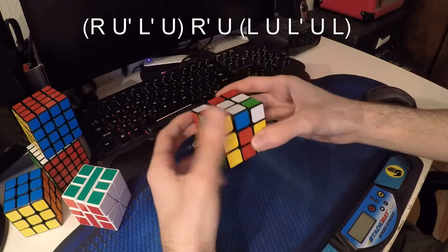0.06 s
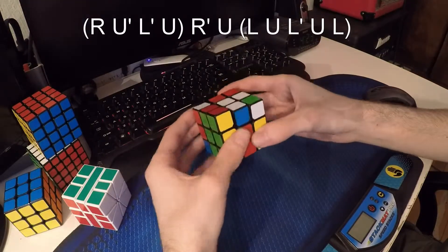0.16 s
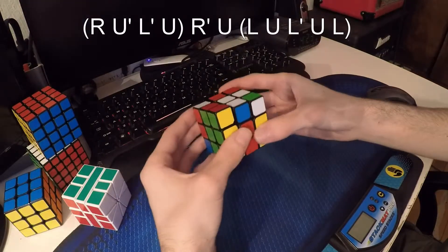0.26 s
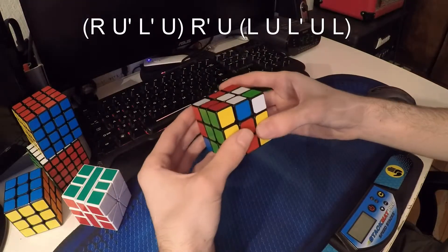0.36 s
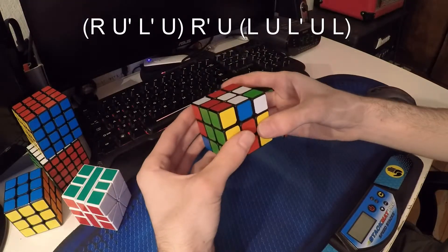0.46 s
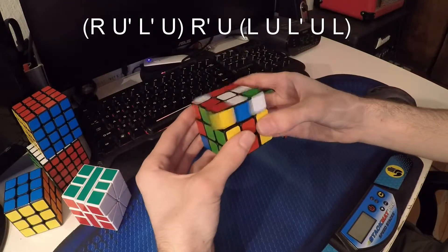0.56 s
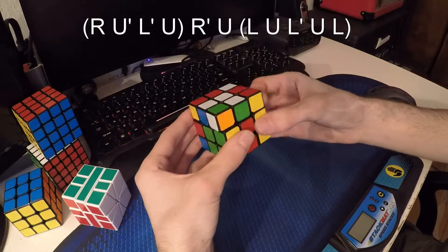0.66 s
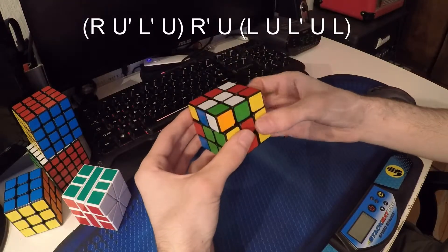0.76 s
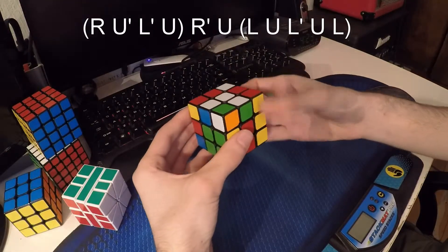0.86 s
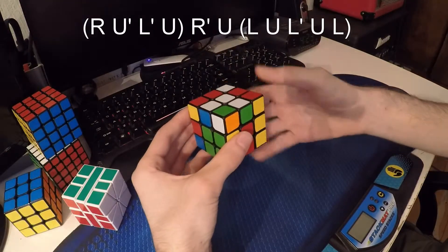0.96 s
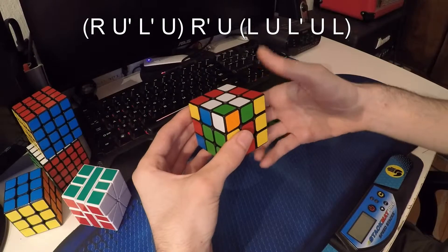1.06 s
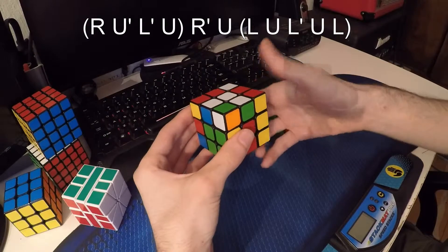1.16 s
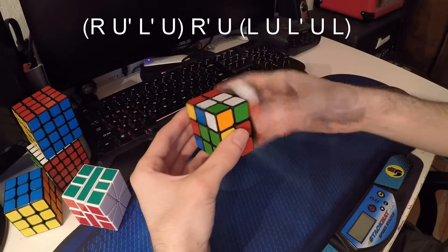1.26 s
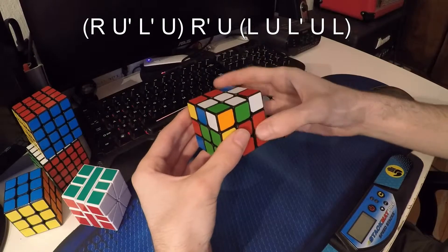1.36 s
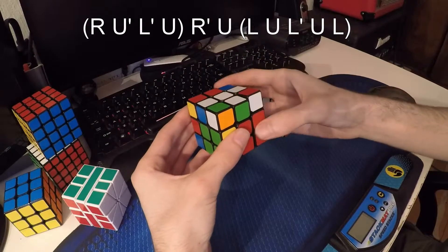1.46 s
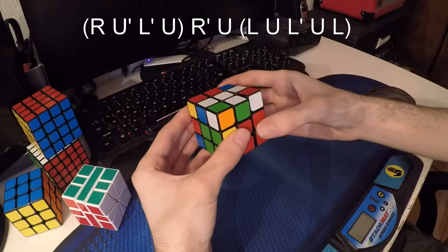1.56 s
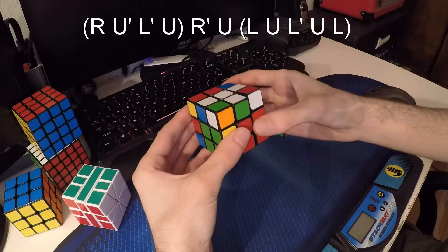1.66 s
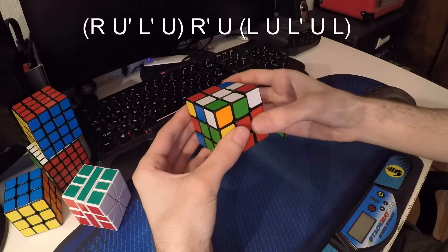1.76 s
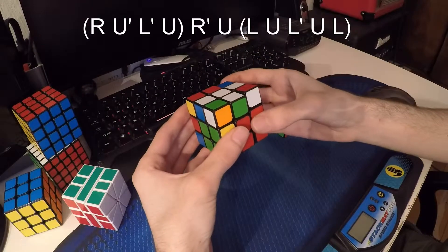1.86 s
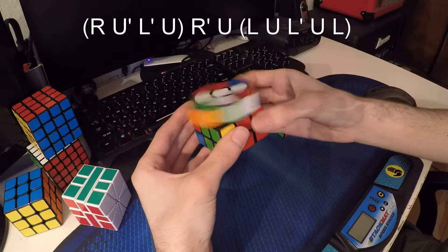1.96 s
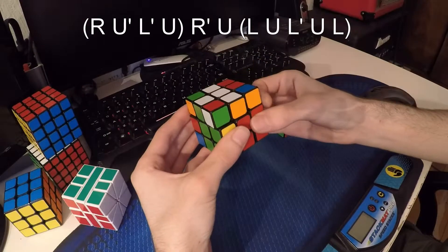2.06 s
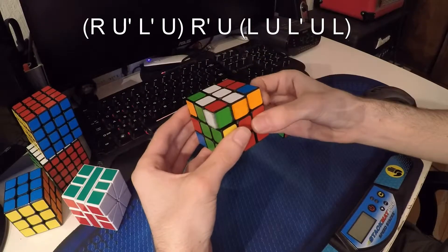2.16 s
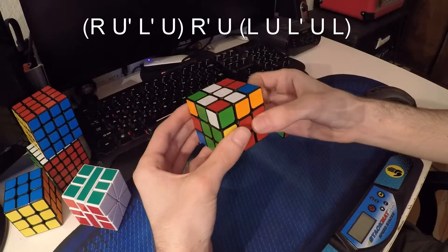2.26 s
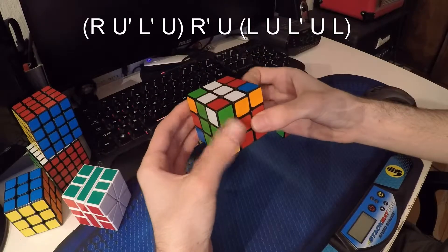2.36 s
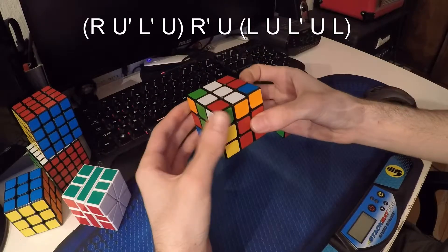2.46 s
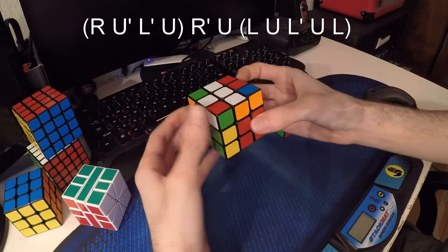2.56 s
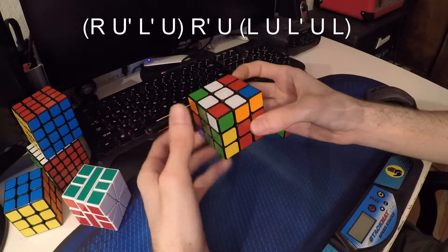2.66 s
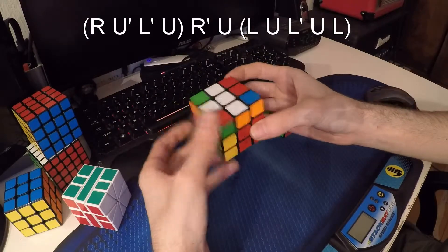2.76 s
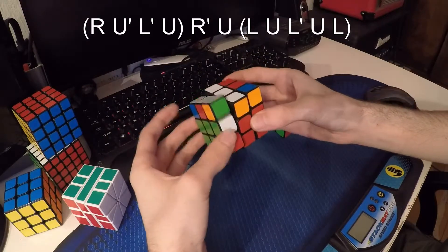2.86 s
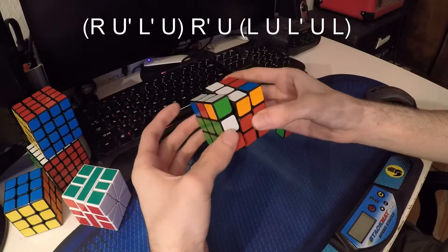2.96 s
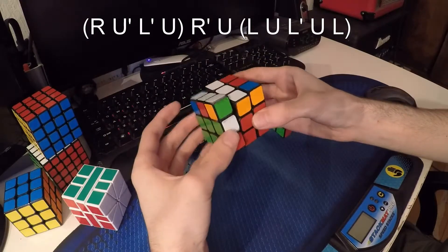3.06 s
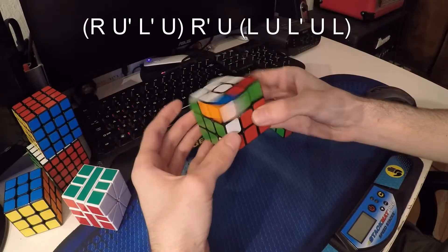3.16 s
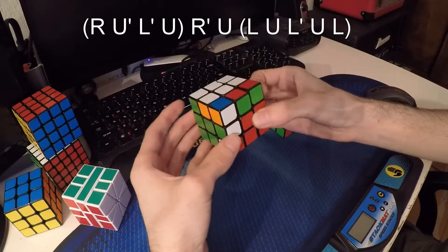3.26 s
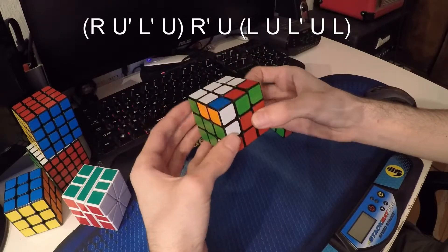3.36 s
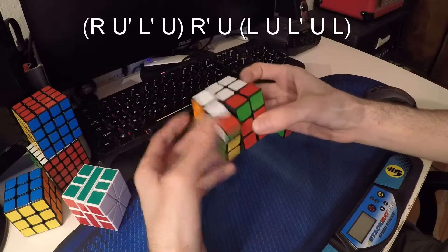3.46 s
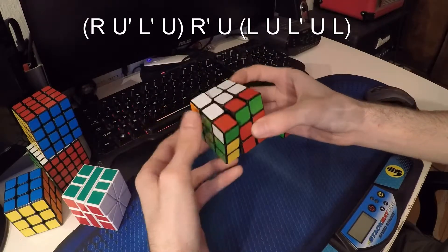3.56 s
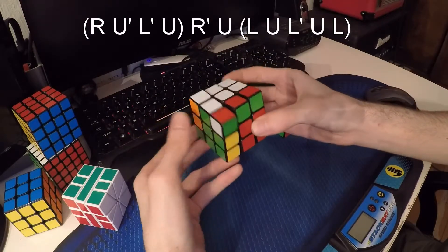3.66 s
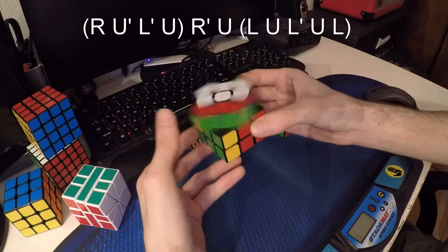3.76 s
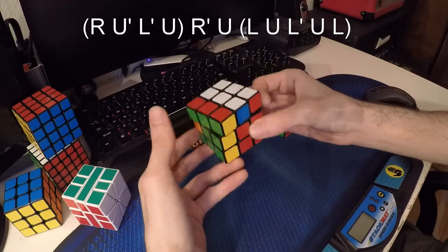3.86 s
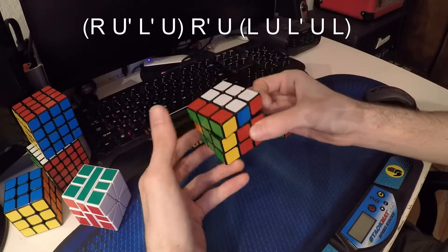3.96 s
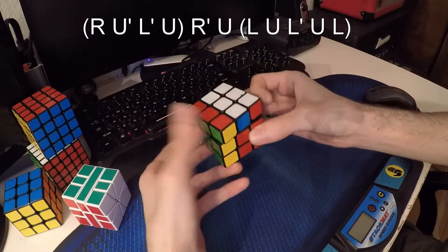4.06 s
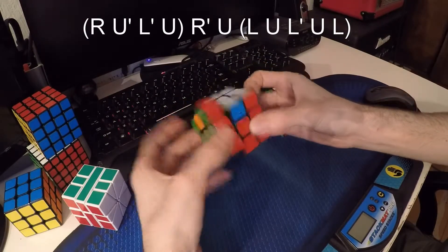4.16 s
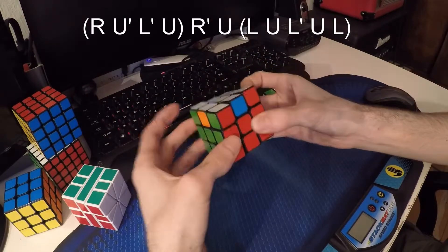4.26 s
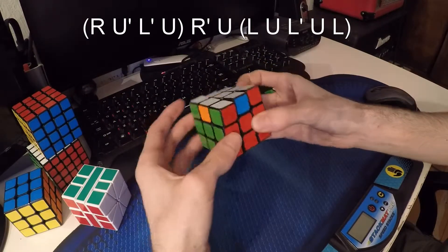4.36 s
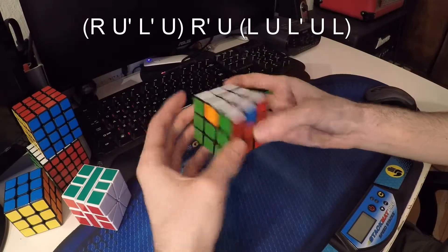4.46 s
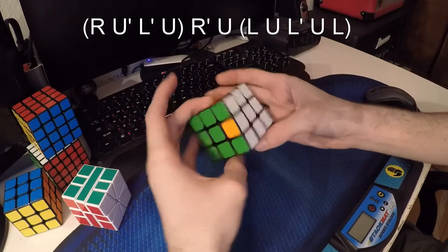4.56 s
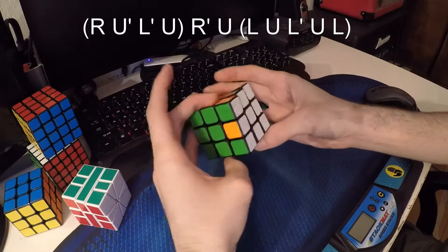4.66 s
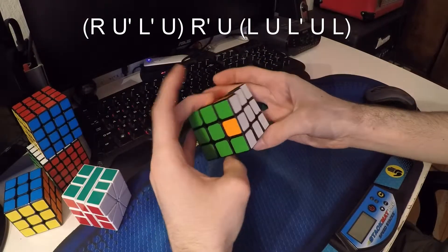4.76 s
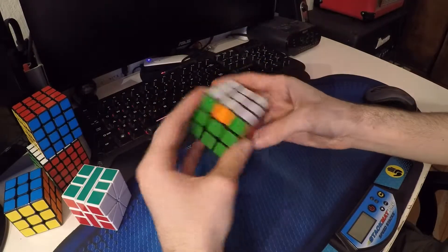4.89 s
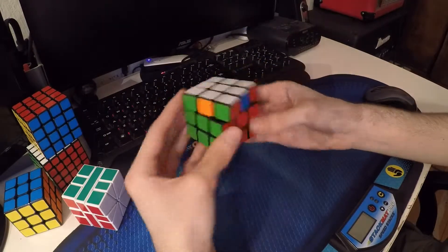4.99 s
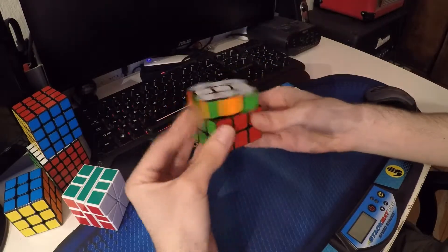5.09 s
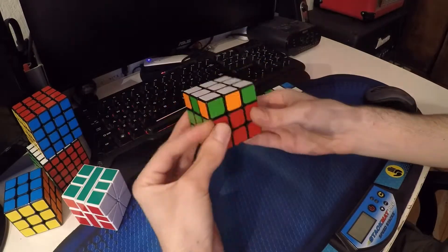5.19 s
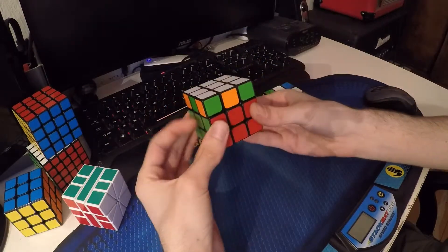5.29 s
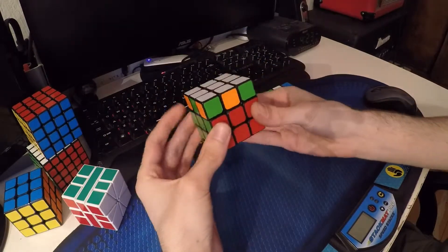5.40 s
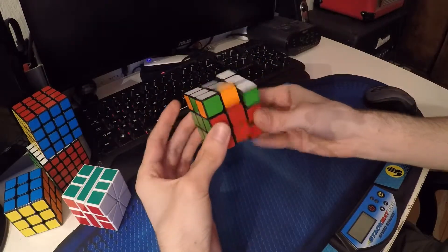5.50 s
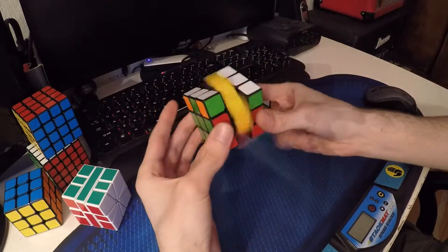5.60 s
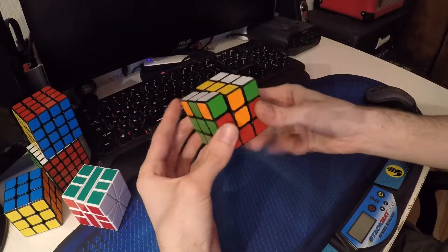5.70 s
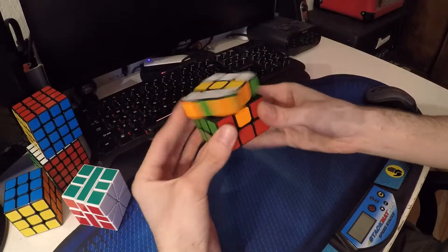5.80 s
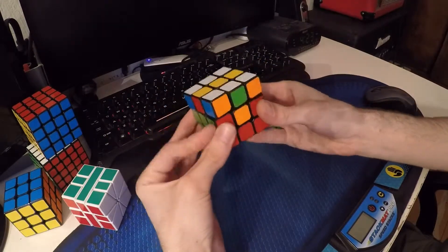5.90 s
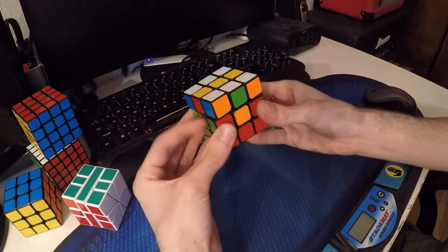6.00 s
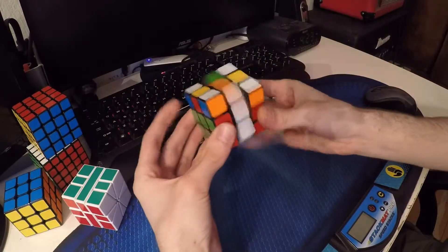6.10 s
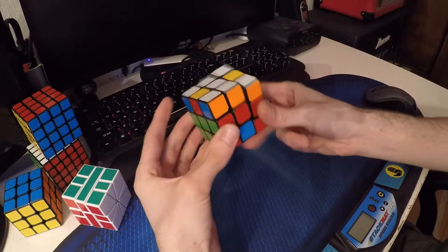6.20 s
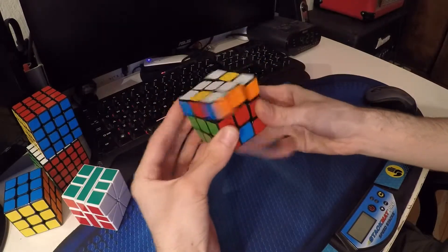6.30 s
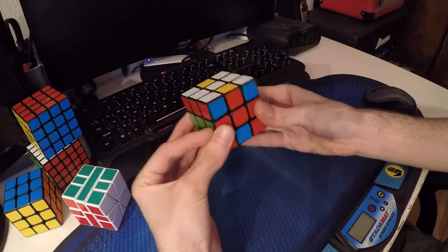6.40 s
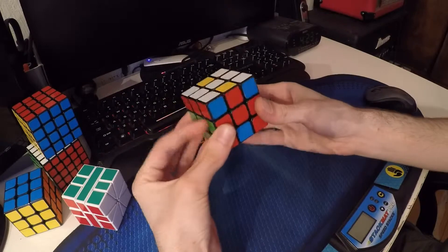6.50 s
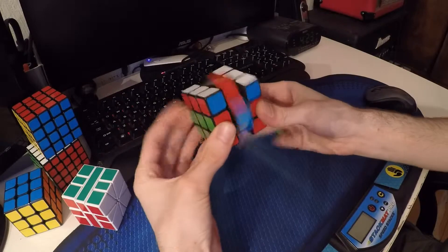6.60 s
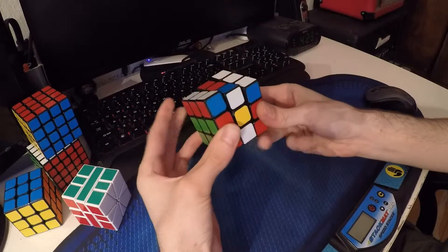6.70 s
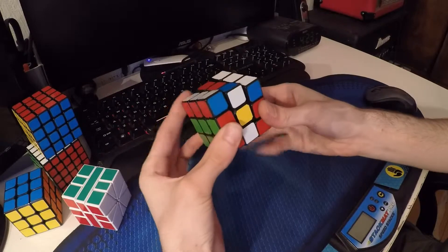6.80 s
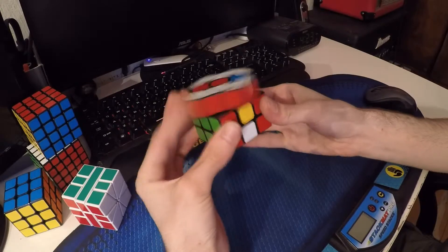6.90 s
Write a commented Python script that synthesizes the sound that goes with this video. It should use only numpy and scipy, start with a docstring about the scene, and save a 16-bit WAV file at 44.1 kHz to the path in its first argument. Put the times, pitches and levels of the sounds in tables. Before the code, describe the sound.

Over the faint, steady hum of a computer fan, hands turn a plastic puzzle cube close to a small microphone. The hollow pieces snap together in brief clusters of bright clacks, separated by soft ticks and an occasional faint low thud through the desk. After a short lull, the twists return in a quicker, denser run. The small room adds a slight, short echo.

```python
"""A computer fan hums throughout. From the start, a plastic puzzle cube is twisted by hand over a desk,
close to a small microphone. Each twist is a run of clacks as hollow pieces ride over and snap against
each other; a small room answers. From 0.22 s, loose pieces tick now and then as the fingers shift grip.
From 0.6 s, some twists shake the desk faintly. The densest run of clacks comes just after 6 s."""
import sys
import numpy as np
from scipy import signal
from scipy.fft import rfft, irfft
from scipy.io import wavfile
from scipy.ndimage import uniform_filter1d

SR = 44100
rng = np.random.default_rng(int(sys.argv[2]) if len(sys.argv) > 2 else 0)


def master(y):
    """Save y as 16-bit WAV."""
    cut = np.clip(np.atleast_2d(y).T, -1, 1)
    pcm = np.round(cut * 32767)  # scale
    wavfile.write(sys.argv[1], SR, pcm.astype(np.int16))


N = 306054
STRIKE_SAMPLES, ONSET_SAMPLE = 2048, 440
STRIKE_BINS_HZ = np.arange(STRIKE_SAMPLES // 2 + 1) * SR / STRIKE_SAMPLES


def undb(db):
    return 10 ** (np.asarray(db) / 20)


def at_rms(x, db):
    return x * undb(db) / np.sqrt(np.mean(x ** 2))


def unit_burst(x):
    """Scale each row so its loudest millisecond has the power of a unit sine."""
    power = uniform_filter1d(x ** 2, size=44)
    return x / np.sqrt(2 * power.max(axis=1, keepdims=True))


def resonance(f, hz, width_hz):
    """Causal band-pass response, gain 1 at the centre."""
    return 1j * f * width_hz / (hz ** 2 - f ** 2 + 1j * f * width_hz)


def drift(rate_hz):
    """Random steps, smoothed twice; spread near 1."""
    hold = int(SR / rate_hz)
    steps = np.repeat(rng.standard_normal(N // hold + 1), hold)
    return 1.42 * uniform_filter1d(uniform_filter1d(steps, hold), hold)[:N]


# Casing and room resonances excited by the fan's air: centre_hz, width_hz, rms_db
FAN_MODES = [(40.5, 4.2, -56.5), (130.2, 5.6, -62), (173.1, 2.9, -63.5), (246.3, 5.3, -58.5),
             (302, 34, -66.5), (427, 84, -64.5)]
# Air rush spectrum: frequency_hz, relative_density_db
RUSH_SPECTRUM = [(12, -66), (20, -17), (44, -7.5), (70, -5), (90, -15), (116, -16.5), (259, -18.5),
                 (333, -20), (906, -26.5), (1270, -27), (1670, -30.5), (1980, -32.5), (7310, -47),
                 (13100, -52), (15500, -54)]


def fan(hum_hz=65.2, hum_db=-46.5, rush_db=-50.5):
    """A wavering motor hum and ringing resonances over a steady rush of air."""
    phase = 2 * np.pi * np.cumsum(hum_hz * (1 + 0.003 * drift(3.22))) / SR
    out = at_rms(undb(0.66 * drift(2.64)) * np.sin(phase), hum_db)
    f = np.maximum(np.arange(N // 2 + 1) * SR / N, 1)
    for hz, width_hz, db in FAN_MODES:
        noise = rfft(rng.standard_normal(N))
        out += at_rms(irfft(noise * resonance(f, hz, width_hz) ** 2, N), db)
    hz, db = np.transpose(RUSH_SPECTRUM)
    colour = undb(np.interp(np.log(f), np.log(hz), db))
    rush = irfft(rfft(rng.standard_normal(N)) * colour, N)
    return out + at_rms(rush, rush_db)


# Pieces snapping together: start_s, level_db, pitch_hz, rattle_ms
CLACKS = [(-.03, -21, 4740, 2.8), (0.013, -41.5, 5100, 4.7), (.1217, -34, 4800, 2.9),
          (0.3047, -47, 5000, 3), (.458, -46, 3100, 1.5), (0.4729, -44, 4670, 1.43), (0.593, -39, 5840, 13),
          (.6235, -27, 5570, 7.5), (.651, -19.5, 4300, 2.4), (.657, -26.5, 3200, 3.6),
          (0.6731, -23.5, 5450, 3.9), (0.824, -42.5, 4100, 3.8), (0.8654, -35, 5400, 2.4),
          (1.145, -34.5, 2960, 1.8), (1.2528, -23, 4860, 3.8), (1.277, -30, 4540, 5.1),
          (1.302, -30.5, 5100, 5.9), (1.308, -33.5, 5000, 2), (1.3188, -33.5, 3330, 3.1),
          (1.3515, -39.5, 4800, 3), (1.709, -43.5, 4860, 3.54), (1.929, -35, 5400, 2.9),
          (1.9733, -31, 4820, 5.5), (2.0038, -21.5, 3630, 2.9), (2.0189, -25, 5500, 13.7),
          (2.024, -13.5, 5200, 8.3), (2.0379, -18, 6150, 1.5), (2.0426, -19, 5170, 4.9),
          (2.062, -28, 4350, 4.4), (2.115, -45, 5000, 8.3), (2.2113, -42, 4330, 3.1),
          (2.2348, -48, 3970, 1.9), (2.376, -41, 6200, 3.2), (2.3983, -47.5, 3640, 3.5),
          (2.813, -30.5, 5200, 4), (2.8398, -19.5, 4560, 2.07), (2.8723, -35, 4700, 6.6),
          (2.8773, -22.5, 4400, 2.46), (3.1174, -30.5, 4250, 3.2), (3.1612, -24, 4040, 3.4),
          (3.1872, -30, 6100, 8.3), (3.1944, -10.5, 5000, 1.26), (3.2024, -18, 5700, 6.3),
          (3.2155, -15, 5200, 3.4), (3.446, -35.5, 4000, 3.6), (3.4553, -40, 5230, 4.6),
          (3.4617, -28.5, 3460, 7.2), (3.493, -38, 4830, 8.6), (3.5063, -28, 4700, 2.9),
          (3.692, -44, 3570, 8.2), (3.7476, -35, 5470, 2.3), (3.7963, -31, 3040, 6.3),
          (3.8124, -22.5, 4470, 2.1), (3.8196, -24.5, 7300, 1.8), (3.8224, -14, 5170, 5.1),
          (3.8451, -31, 4730, 5), (4.147, -34, 5000, 10), (4.154, -16.5, 4500, 2.3),
          (4.1698, -31, 4300, 12), (4.177, -28, 4200, 1.84), (4.1825, -26.5, 5400, 1.46),
          (4.1925, -18, 4550, 17), (4.2062, -14.5, 5120, 3.7), (4.2093, -7, 5360, 2.7),
          (4.3701, -35, 5270, 2.7), (4.4355, -30.5, 4600, 3.2), (4.5602, -45.5, 3563, 10),
          (4.6653, -47.5, 3650, 1.96), (4.9127, -38.5, 3160, 2.58), (4.922, -41, 5230, 2.17),
          (4.9968, -43, 6740, 2.8), (5.0042, -41.5, 4500, 3.2), (5.0319, -31, 4220, 3.3),
          (5.0792, -45.5, 3500, 23), (5.1017, -32.5, 4260, 1.7), (5.1116, -38, 4600, 4.2),
          (5.1272, -36, 3070, 5), (5.135, -28.5, 3860, 1.3), (5.1451, -35.5, 4800, 5.4),
          (5.152, -36.5, 3700, 5), (5.3727, -44.5, 3900, 4.2), (5.44, -42.5, 4400, 2.3),
          (5.5407, -30.5, 3970, 6.8), (5.561, -20, 4030, 3.1), (5.574, -28, 4000, 2.4),
          (5.578, -22.5, 4600, 12.5), (5.5853, -15.5, 5070, 2.1), (5.595, -17, 4850, 4.9),
          (5.614, -28.5, 4600, 2.9), (5.634, -20.5, 3730, 3.6), (5.644, -27.5, 4600, 5.4),
          (5.6487, -27.5, 5050, 3.9), (5.6603, -13, 4720, 2.3), (5.791, -32, 4900, 1.87),
          (5.8362, -25.5, 3940, 3.6), (5.864, -23, 4440, 3.5), (5.8715, -15, 4380, 1.6),
          (5.8806, -33.5, 4240, 7.1), (6.0546, -38, 4970, 1.9), (6.096, -40.5, 3400, 5),
          (6.1085, -27, 4420, 13), (6.1193, -15.5, 3760, 3), (6.1278, -21.5, 3970, 5.5),
          (6.1335, -11.5, 5380, 7.2), (6.141, -13.5, 4200, 5.5), (6.152, -14, 4860, 6.2),
          (6.1625, -25, 5300, 3.2), (6.1781, -23, 5140, 3.8), (6.198, -29, 4300, 3.9),
          (6.2087, -24, 4600, 4.2), (6.2116, -24, 4900, 9.8), (6.2198, -13, 5500, 5.1),
          (6.2304, -23, 4700, 6.1), (6.3137, -38.5, 3980, 14), (6.3615, -27.5, 4040, 5.1),
          (6.3831, -26.5, 4400, 18), (6.3941, -19.5, 4930, 1), (6.405, -30, 4480, 1.8),
          (6.6073, -44, 4400, 3.4), (6.6331, -19.5, 4500, 2.18), (6.6451, -29, 4010, 10.2),
          (6.6565, -22, 4560, 1.8), (6.6614, -12.5, 4970, 1.8), (6.6672, -17.5, 4650, 2),
          (6.679, -30.5, 4430, 7.5), (6.868, -45, 3880, 3.1), (6.887, -42.5, 3830, 6.2),
          (6.911, -43.5, 4600, 11.4), (6.9181, -28, 3140, 5.6)]


def clacks(firm_db=-30, catch_lead_ms=2.6, follow_lag_ms=10.5):
    """Strike rows. Edges catch just before a firm clack; a softer copy follows about 10 ms after it."""
    rows = np.array(CLACKS)
    start_s, db, hz, _ = rows[rows[:, 1] > firm_db].T
    a, b, c = rng.uniform(-.5, .5, (3, len(start_s)))
    catch_s = start_s - (catch_lead_ms + 1.6 * c) / 1000
    follow_s = start_s + (follow_lag_ms + 6 * a) / 1000
    catches = np.transpose([catch_s, db - 17 + 6 * a, hz, 2.3 * (1 + b)])
    followers = np.transpose([follow_s, db - 20.5 + 6 * b, hz, 7.7 * (1 + c)])
    return np.concatenate([rows, followers, catches])


def contact_force(rattle_ms):
    """Per strike: a scrape as faces close in, a first blow, a dying rattle of smaller ones."""
    shape = (len(rattle_ms), STRIKE_SAMPLES)
    t_ms = (np.arange(STRIKE_SAMPLES) - ONSET_SAMPLE) / SR * 1000
    age_ms, length_ms = np.maximum(t_ms, 0), rattle_ms + 0.12
    # many small contacts, a few large
    grains = rng.choice([-1, 1], shape) * undb(rng.exponential(3.5, shape))
    scrape = undb(-24) * np.exp(-np.abs(t_ms) / 1.5)
    rise = 1 - np.exp(-age_ms / (0.048 * length_ms))
    decay = np.exp(-(age_ms / (0.59 * length_ms)) ** 0.64)
    force = 0.15 * grains * (scrape + rise * decay)
    force[:, [ONSET_SAMPLE]] += 2.93 / length_ms  # a short clack is mostly one hard contact
    return force


def ring(modes, strike_count):
    """Each strike lands elsewhere, so the modes ring in new proportions."""
    return sum(rng.uniform(-1, 1, (strike_count, 1)) * undb(db) * resonance(STRIKE_BINS_HZ, hz, width_hz)
               for hz, width_hz, db in modes)


# Cube shell modes: centre_hz, width_hz, relative_db
SHELL_MODES = [(2560, 990, 2.5), (2884, 186, 2), (3430, 250, 6.5), (4330, 1650, -21), (5480, 4300, -4),
               (6480, 205, 2.5), (6800, 2200, 1)]


def shell_ring(force_spectra, piece_response):
    """The struck piece rings broadly, together with the shell's modes."""
    response = piece_response + 0.727 * ring(SHELL_MODES, len(force_spectra))
    return unit_burst(irfft(force_spectra * response))


# Air modes inside the pieces: centre_hz, width_hz, relative_db
CAVITY_MODES = [(584, 95, 8.5), (797, 260, 4.5), (1500, 270, 5), (1790, 680, 9)]


def hollow_knock(force_spectra):
    """The air inside the pieces answers with a lower knock."""
    response = ring(CAVITY_MODES, len(force_spectra)) + 0.1 * resonance(STRIKE_BINS_HZ, 1440, 2700) ** 2
    return unit_burst(irfft(force_spectra * response))


def knock_balance_db(level_db, rattle_ms, best_db=-30.5):
    """Knock relative to shell: greatest at mid level, as hard blows ring mostly the shell."""
    over_db = level_db - best_db
    loss_db = np.maximum(0.57 * over_db, -0.17 * over_db)
    pump_db = 1.78 * np.log2(rattle_ms + .5)  # a longer rattle pumps the hollow more
    return -10.5 - loss_db + pump_db + rng.uniform(-3.5, 3.5, level_db.shape)


def cube(strikes, lead_samples, contact_hz=8660, spot_count=5):
    """Strikes rung through the plastic: direct sound, and room feeds from a few spots in the hands."""
    start_s, level_db, pitch_hz, rattle_ms = strikes.T[:, :, None]
    f = STRIKE_BINS_HZ
    # plastic yields, so contacts last long enough to dull the top
    bend = contact_hz ** 2 - f ** 2 + 1j * f * contact_hz
    softness = (contact_hz ** 2 - undb(-25.5) * f ** 2 + .4j * f * contact_hz) / bend
    force_spectra = rfft(contact_force(rattle_ms)) * softness
    piece = resonance(f, pitch_hz, 1.326 * pitch_hz) ** 2 + undb(-12.5) * resonance(f, 11700, 12500) ** 2
    bass_cut = 1 / (1 + (520 / (f + 1)) ** 6)  # a small body radiates no bass
    knock_db = knock_balance_db(level_db, rattle_ms)
    knock = undb(knock_db) * hollow_knock(force_spectra * bass_cut)
    sounds = undb(level_db) * (shell_ring(force_spectra, piece) + knock)
    # modes even out over all directions: the room gets equal energy in a smooth colour
    colour = piece + undb(knock_db + 1.5) * bass_cut * resonance(f, 956, 920) ** 2
    smooth = np.roll(irfft(colour * softness), ONSET_SAMPLE, axis=1)
    smooth *= np.linalg.norm(sounds, axis=1, keepdims=True) / np.linalg.norm(smooth, axis=1, keepdims=True)
    end = lead_samples + N
    direct = np.zeros(end + STRIKE_SAMPLES)
    feeds = np.zeros((spot_count, len(direct)))
    for k, start in enumerate((start_s[:, 0] * SR).astype(int) + lead_samples - ONSET_SAMPLE):
        direct[start:start + STRIKE_SAMPLES] += sounds[k]
        feeds[k % spot_count, start:start + STRIKE_SAMPLES] += smooth[k]
    return direct[:end], feeds[:, :end]


# Room tail bands: centre_hz, t60_s, relative_db
ROOM_BANDS = [(643, 0.166, 6.5), (1560, 0.33, -4.5), (2640, 0.48, -19.5), (6460, 0.31, -11.5),
              (11130, 0.17, -4)]


def room(feeds, wall_ms=7.5):
    """The nearest wall answers, then a diffuse tail dies band by band; one tail per spot."""
    t, f = np.arange(SR) / SR, np.arange(SR // 2 + 1)
    noise = rfft(rng.standard_normal((len(feeds), SR)))
    onset = 1 / (1 + np.exp(np.clip((wall_ms - 1000 * t) / 0.74, -50, 50)))
    tails = 0
    for hz, t60_s, db in ROOM_BANDS:
        band = irfft(noise * resonance(f, hz, 0.65 * hz))
        tails += undb(db - 28.5) * band * onset * undb(-60 * t / t60_s)
    return signal.fftconvolve(feeds, tails, axes=1)[:, :feeds.shape[1]].sum(axis=0)


# Grip shifts: start_s, end_s, level_db
GRIP_SHIFTS = [(.22, 0.563, -51), (0.766, 0.906, -47), (2.157, 2.444, -57), (3.095, 3.17, -50),
               (3.583, 3.793, -56), (4.502, 4.95, -53.5), (5.17, 5.54, -51), (6.054, 6.09, -50),
               (6.605, 6.63, -40), (6.792, 6.913, -60)]


def grip_ticks(ticks_per_s=22, pitch_hz=3700, rattle_ms=3):
    """Strike rows. Loose pieces tick as the fingers shift."""
    rows = []
    for start_s, end_s, db in GRIP_SHIFTS:
        count = int(np.ceil((end_s - start_s) * ticks_per_s))
        tick_s = start_s + (end_s - start_s) * (np.arange(count) + rng.random(count)) / count
        a, b, c = rng.uniform(-.5, .5, (3, count))
        rows.append(np.transpose([tick_s, db + 10.5 * a, pitch_hz + 1000 * b, rattle_ms * (1 + c)]))
    return np.concatenate(rows)


# Pushes on the desk through the forearms: start_s, level_db
DESK_PUSHES = [(.6, -60.5), (1.25, -46), (2.819, -35), (4.16, -38.5), (5.17, -44), (6.341, -46),
               (6.751, -48)]


def desk(mode_hz=37.7, t60_s=0.94, rise_s=0.009):
    """Each soft push sets the desk's lowest mode swinging."""
    t, out = np.arange(N) / SR, np.zeros(N)
    for start_s, db in DESK_PUSHES:
        age_s = np.maximum(t - start_s, 0)
        envelope = (1 - np.exp(-age_s / rise_s)) * undb(db - 60 * age_s / t60_s)
        out += envelope * np.sin(2 * np.pi * mode_hz * age_s)
    return out


def scene():
    lead_samples = SR // 10  # a clack just before the start still rings in the room
    strikes = np.concatenate([clacks(), grip_ticks()])
    direct, feeds = cube(strikes, lead_samples)
    twists = (direct + room(feeds))[lead_samples:]
    return (fan() + twists + desk())[None]


def record(dry, mic_hz=15150, cutoff_hz=16500):
    """The microphone fades above its top resonance; the recorder cuts the rest."""
    mic = signal.sosfilt(signal.cheby1(12, .5, mic_hz, fs=SR, output="sos"), dry)
    return signal.sosfilt(signal.ellip(10, .2, 80, cutoff_hz, fs=SR, output="sos"), mic)


dry = scene()
out = record(dry)
master(out)
```